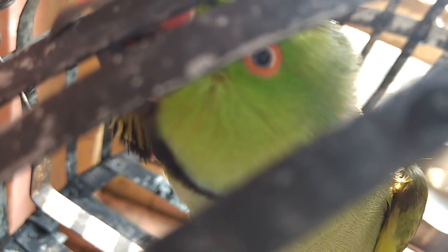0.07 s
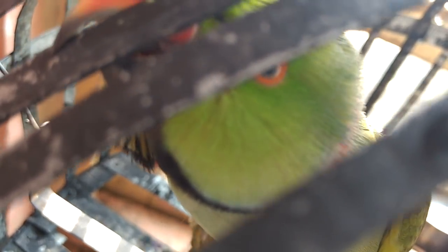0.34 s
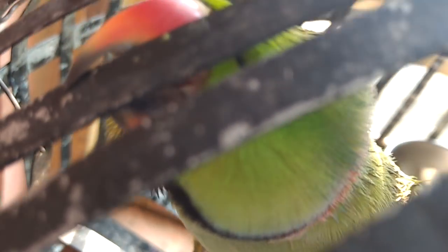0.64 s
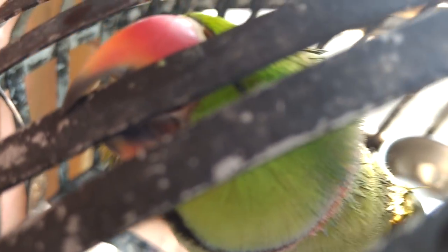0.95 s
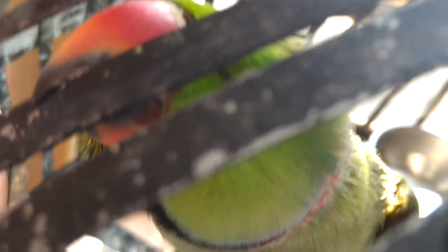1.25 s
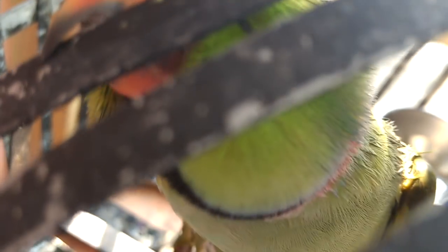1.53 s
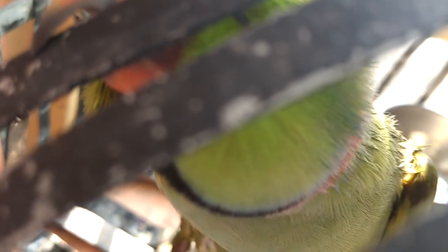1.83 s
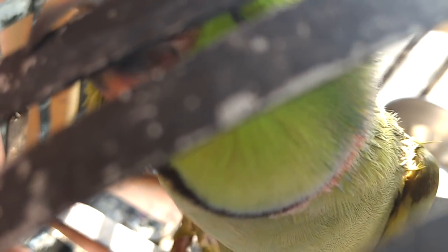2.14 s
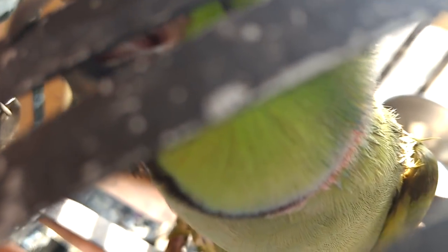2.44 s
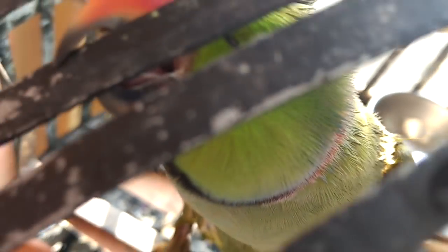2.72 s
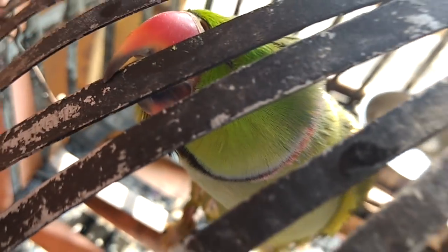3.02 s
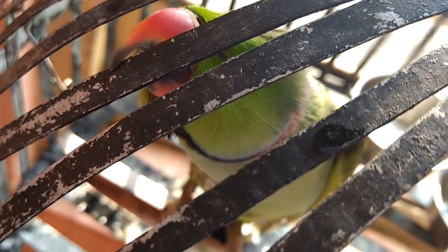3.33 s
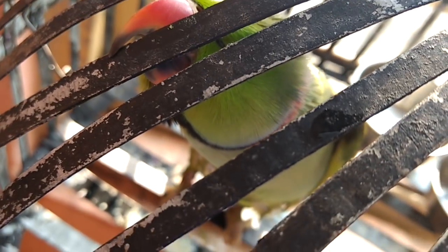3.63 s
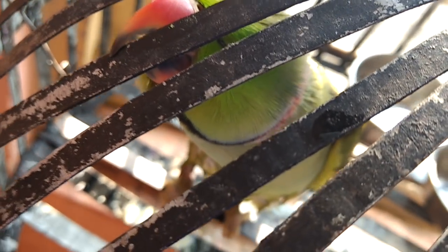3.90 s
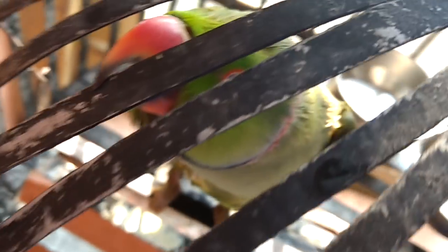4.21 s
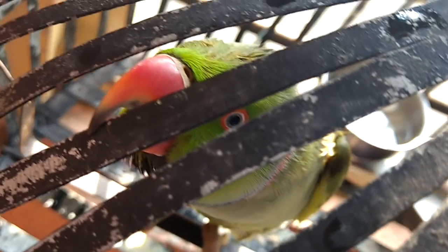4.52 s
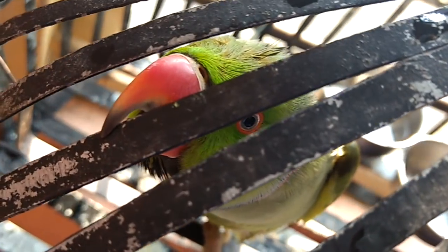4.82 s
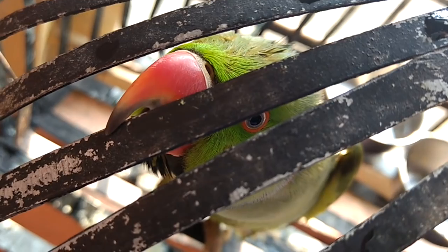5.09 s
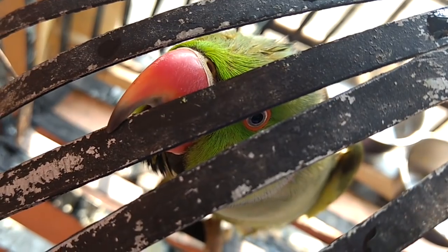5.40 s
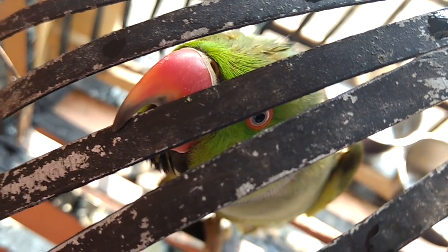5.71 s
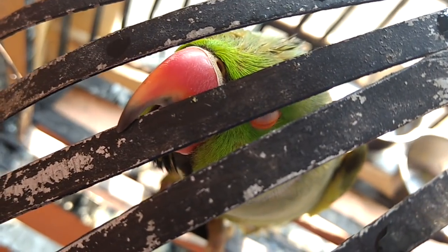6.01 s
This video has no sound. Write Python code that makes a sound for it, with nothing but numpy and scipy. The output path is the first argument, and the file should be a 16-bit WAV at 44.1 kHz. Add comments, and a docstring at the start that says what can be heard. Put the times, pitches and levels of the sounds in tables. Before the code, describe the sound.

Close, hoarse parrot rasping with soft feather rustles, a short pause, then more rasps and two squawks in a quiet room.

```python
"""A caged parrot rasps close by, about three strokes a second, pauses, and rasps on into squawks.
Air flutters through its throat and rings throat and beak resonances over a hollow low ring; each
stroke snaps or eases in, swells and dies away, with soft mutters between. The squawks are pulses
shaped by the throat. Feathers rustle, the beak ticks twice in the pause, and faint chirps are heard.
A small, hushed room answers."""
import sys
import numpy as np
from scipy import signal
from scipy.fft import rfft, irfft, next_fast_len
from scipy.io import wavfile
from scipy.ndimage import uniform_filter1d, map_coordinates

SR = 44100
rng = np.random.default_rng(int(sys.argv[2]) if len(sys.argv) > 2 else 0)


def store_pcm(level_fs):
    """Save levels as 16-bit WAV."""
    pcm = np.round(np.clip(level_fs, -1, 1) * 32767).astype(np.int16)
    wavfile.write(sys.argv[1], SR, np.atleast_2d(pcm).T)


N = 266849


def amp(db):
    """Decibels to gain."""
    return 10 ** (np.asarray(db) / 20)


def unit(x):
    """x at rms 1."""
    return x / np.sqrt(np.mean(x ** 2) + 1e-20)


def along(points, hz):
    """Interpolate (frequency [Hz], value) points on a log axis."""
    f, v = np.transpose(points)
    return np.interp(np.log(hz + 1), np.log(f + 1), v)


def curves(rows):
    """A gate open while the timed rows last, then each column per sample."""
    s, *cols = np.transpose(rows)
    t = np.arange(N) / SR
    gate = uniform_filter1d(1.0 * ((t >= s[0]) & (t <= s[-1])), size=256)
    return [gate] + [np.interp(t, s, c) for c in cols]


def wobble(rate_hz):
    """Smooth random curve with knots at rate_hz."""
    knots = rng.standard_normal(int(N * rate_hz / SR) + 4)
    return map_coordinates(knots, [np.arange(N) * rate_hz / SR])


def filtered(x, response):
    """x through a complex frequency response."""
    m = next_fast_len(N + SR // 2)
    return irfft(rfft(x, m) * response(np.fft.rfftfreq(m, 1 / SR)), m)[..., :N]


def coloured(x, spectrum):
    """x through a (frequency [Hz], gain [dB]) spectrum, at rms 1."""
    return unit(filtered(x, lambda hz: amp(along(spectrum, hz))))


def resonance(hz, centre_hz, width_hz):
    """Causal response of one resonance."""
    return 1j * hz * width_hz / (centre_hz ** 2 - hz ** 2 + 1j * hz * width_hz)


def ring(x, centre_hz, width_hz, skirt=9):
    """x through a resonance whose skirts a wider one steepens, at rms 1."""
    response = lambda hz: resonance(hz, centre_hz, width_hz) * resonance(hz, centre_hz, skirt * width_hz)
    return unit(filtered(x, response))


def steadied(x, share, window_s=0.035):
    """A flow-driven vibration limits itself: chance swells are partly evened out."""
    power = np.abs(uniform_filter1d(x ** 2, size=int(window_s * SR))) + 1e-6
    return unit(x / power ** (share / 2))


def push(t, rise_s, attack_s, fall_db_per_s, swell_db_per_s=0, hold_s=0):
    """One push of air: a gate that snaps open and an effort that swells, holds and dies."""
    swell_db = -swell_db_per_s * np.maximum(rise_s - t, 0)
    effort_db = swell_db - fall_db_per_s * np.maximum(t - rise_s - hold_s, 0)
    return np.clip(t / attack_s, 0, 1), effort_db


def rasp_levels(mutter_scratch_db=-10, mutter_hiss_db=-15):
    """Strokes, mutters and flares drive five bands [dB]: throat, half-closed, open beak, scratch, hiss."""
    # (start [s], rise [s], effort fall [dB/s], peak drive [dB],
    #  then re peak: throat [dB], half-closed beak [dB], open beak [dB], hiss [dB])
    strokes = [(-0.011, 0.06, 105, -27.5, 3, -4, -0.5, -2), (0.204, 0.045, 90, -26.3, 3, -1.5, -4, 1),
               (0.543, 0.012, 120, -33, 1, -4, -7, 6), (0.6, 0.045, 70, -29, 3, -7, -5, -5),
               (0.768, 0.012, 60, -35, 0, -3, 4, 2), (0.805, 0.05, 95, -31, 7, -1.5, 3.5, 1),
               (1.186, 0.05, 150, -28.5, 6.5, -2, 4, -2), (1.413, 0.033, 105, -28.5, 5.5, 0.5, 3, 1),
               (1.795, 0.02, 92, -30, 7, 0.5, 2, 0), (2.007, 0.08, 140, -28.5, 5.5, 3, -1, 4),
               (2.598, 0.035, 100, -33.5, 1, -2, 6, 2), (2.659, 0.036, 175, -25.3, 2.5, 3, -3, 3.5),
               (2.954, 0.006, 170, -31.5, 5, -1, -8, 3), (2.995, 0.03, 115, -28.5, 7, 1, -8, 5),
               (3.184, 0.02, 130, -30.5, 7.5, 1, 8, -1), (3.235, 0.055, 171, -27, 3.5, 2.5, -14, 0),
               (4.55, 0.17, 63, -40, 7, -4.5, -5, 1), (4.749, 0.017, 202, -34, 7, -2, 4, 0),
               (4.905, 0.035, 85, -28.5, 5, 1.5, 0, 3), (5.245, 0.06, 75, -29.5, 4, 2.5, 4, 0),
               (5.47, 0.095, 120, -28.5, 7.5, -1, 4, 3), (5.85, 0.013, 60, -37, 8.5, 1, -3, 0),
               (5.925, 0.0083, 97, -31, 8, 2, 5, 0)]
    # per band: (growth with effort [dB/dB])
    growth = [1.117, 0.86, 1.95, 1.15, 1.15]
    # per band: (stroke attack [s])
    attacks_s = [0.008, 0.013, 0.008, 0.008, 0.008]
    # (start [s], length [s], throat drive [dB], then re throat: half-closed beak [dB], open beak [dB])
    mutters = [(0.43, 0.13, -39, 1, -6), (0.908, 0.05, -31.5, 2, -14), (1.08, 0.1, -34.5, 3, -3),
               (1.332, 0.11, -32.5, -6, 2), (1.678, 0.11, -34.5, 6, -4), (2.32, 0.092, -34.5, 0.5, -15),
               (2.418, 0.11, -32, -6, -5), (2.895, 0.05, -43, 4, -8), (4.832, 0.089, -42, -8, 1),
               (5.184, 0.055, -32.5, 7.5, -5), (5.433, 0.12, -36, 2, 0), (5.757, 0.047, -42, 3, -10)]
    # one resonance flares: (time [s], half width [s], drive [dB], band)
    flares = [(0.084, 0.017, -16, "open"), (0.249, 0.009, -13.5, "open"), (0.66, 0.0095, -14, "open"),
              (1.78, 0.012, -25, "throat"), (2.069, 0.012, -21, "open"), (2.11, 0.02, -19, "half"),
              (5.164, 0.0035, -22.5, "half"), (5.191, .004, -22, "half"), (5.251, 0.011, -17.5, "half"),
              (5.225, 0.006, -22, "half")]
    t = np.arange(N) / SR
    power = np.full((len(growth), N), 1e-12)
    after = lambda s: slice(*np.searchsorted(t, [s, s + .5]))
    for s, rise_s, fall, db, throat_db, half_db, open_db, hiss_db in strokes:
        on = after(s)
        gate, effort_db = push(t[on] - s, rise_s, np.c_[attacks_s], fall, swell_db_per_s=95, hold_s=0.011)
        peaks_db = db + np.c_[[throat_db, half_db, open_db, 0, hiss_db]]
        power[:, on] += (gate * amp(peaks_db + np.outer(growth, effort_db))) ** 2
    for s, length_s, db, half_db, open_db in mutters:
        on = after(s)
        gate, effort_db = push(t[on] - s, length_s, attack_s=0.0062, fall_db_per_s=220)
        gains = amp([0, half_db, open_db, mutter_scratch_db, mutter_hiss_db])
        power[:, on] += np.outer(gains, gate * amp(db + effort_db)) ** 2
    for s, width_s, db, band in flares:
        on = np.abs(t - s) < 10 * width_s
        row = ["throat", "half", "open"].index(band)
        power[row, on] += amp(db) ** 2 * np.exp(-((t[on] - s) / width_s) ** 2)
    return 10 * np.log10(power)


def flutter(rate_hz=165, scatter=0.4, spread_db=4, slap_gain=0.46, depth_db=0.5):
    """Loosely flapping membranes chop the air: uneven slaps, each with a puff of turbulence."""
    cycles = np.cumsum(rate_hz * np.exp(scatter * wobble(rate_hz))) / SR
    slaps = np.diff(np.floor(cycles), prepend=0) * amp(-spread_db * rng.random(N))
    puffs = rng.standard_normal(N) * amp(depth_db * np.cos(2 * np.pi * cycles))
    return unit(slap_gain * unit(slaps) + unit(puffs))


def throat_ring(air, sway_db=2.5):
    """The throat sways between two close resonances: as one grows, the other fades."""
    sway = amp(sway_db * wobble(20))
    lower = ring(air, centre_hz=655, width_hz=65)
    upper = ring(air, centre_hz=750, width_hz=70)
    return steadied(unit(lower * sway - upper / sway), share=0.95)


def wander(x, bend, drift=0.006, rate_hz=14):
    """The tongue never holds still: all frequencies bend and drift by a small fraction."""
    lead = np.cumsum(bend + drift * wobble(rate_hz))
    return map_coordinates(x, [np.arange(N) + lead], mode="mirror")


def beak_ring(air, drive_db, centre_hz, width_hz, bend=0, lock_db=-18.5, drift_hz=20):
    """A beak resonance: noisy when blown softly, locking into a near whistle when blown hard."""
    purity = 1 / (1 + np.exp((lock_db - drive_db) / 2))
    hz = centre_hz * (1 + bend) + drift_hz * wobble(90)
    tone = unit(np.sin(2 * np.pi * np.cumsum(hz) / SR))
    noisy = steadied(wander(ring(air, centre_hz, width_hz), bend), share=0.64)
    return amp(drive_db) * (np.sqrt(1 - purity) * noisy + np.sqrt(purity) * tone)


def patchy(x, depth_db=3.5, bins=4, frames=9):
    """Random narrow peaks and dips give the hiss a faintly tonal grain."""
    z = signal.stft(x, nperseg=1024)[2]
    field = uniform_filter1d(rng.standard_normal(z.shape), size=bins, axis=0)
    field = unit(uniform_filter1d(field, size=frames, axis=1))
    return unit(signal.istft(z * amp(depth_db * field), nperseg=1024)[1][:N])


def scratch(air, scratch_db, hiss_db, split_hz=3600):
    """Broadband air noise: scratch below the split, hiss above."""
    # (frequency [Hz], gain [dB])
    spectrum = [(150, -44), (500, 0.5), (1100, 7), (1900, 5.5), (2500, -1), (3350, -7), (3700, -6),
                (4400, -12.5), (6400, -14), (10500, -26.5), (15500, -36)]
    grit = coloured(patchy(air), spectrum)
    hiss = filtered(grit, lambda hz: 1 - 1 / (1 + (hz / split_hz) ** 10))
    return amp(scratch_db) * (grit - hiss) + amp(hiss_db) * hiss


def crackle(rate_hz=900, spread_db=3.5):
    """Tiny sparse pops of uneven size."""
    pops = (rng.random(N) < rate_hz / SR) * rng.choice([-1, 1], N)
    return unit(pops * amp(spread_db * rng.standard_normal(N)))


def catches(choke_s=0.0027, release_s=0.0045, depth_db=5):
    """Flow gain: the air chokes just before each catch and overshoots as it bursts free."""
    # (time [s])
    catch_times = [1.419, 1.68, 2.662, 2.958, 3.185, 4.752, 5.183]
    db = np.zeros(N)
    for s in catch_times:
        t = np.arange(N) / SR - s
        distance = np.abs(t) / np.where(t < 0, choke_s, release_s)
        db += depth_db * np.sign(t) * np.exp(-np.minimum(distance, 20))
    return amp(uniform_filter1d(db, size=64))


def rasp():
    """Fluttering air rings throat and beak, scratches and crackles. Returns sound and throat drive."""
    # the half-closed beak resonance sinks midway: (time [s], frequency shift [fraction])
    beak_bend = [(2.3, 0.027), (2.9, -0.004)]
    throat_db, half_db, open_db, scratch_db, hiss_db = rasp_levels()
    drive = amp(throat_db)
    air = flutter() * amp(0.93 * wobble(55))
    throat = drive * throat_ring(air)
    beak = beak_ring(air, half_db, centre_hz=1208, width_hz=80, bend=curves(beak_bend)[1])
    beak += beak_ring(air, open_db, centre_hz=1532, width_hz=60)
    grit = scratch(air, scratch_db, hiss_db)
    sizzle = amp(hiss_db - 25.5) * ring(crackle(), centre_hz=7700, width_hz=6000)
    edge_db = (scratch_db + open_db) / 2 - 8.5  # upper resonance of the open beak
    edge = amp(edge_db) * ring(rng.standard_normal(N), centre_hz=2480, width_hz=600)
    rattle = amp(0.89 * wobble(45))
    mix = amp(-1) * throat + amp(0.9) * beak + amp(5.4) * grit + sizzle + edge
    return catches() * rattle * mix, drive


def hollow(drive, lag_s=0.021, exponent=0.61, gain_db=-14.5, pan_db=1.4):
    """A low ring that builds and dies more slowly than the stroke, stronger on the right."""
    # (frequency [Hz], width [Hz], relative gain [dB])
    modes = [(127.2, 3.7, 2.5), (161.6, 14.6, 4.5), (212, 27, 8), (297.5, 83, 4.5), (376.6, 5.4, 7)]
    pole = np.exp(-1 / (lag_s * SR))
    swell = np.abs(signal.lfilter([1 - pole], [1, -pole], drive, zi=[drive[0]])[0]) ** exponent
    air = rng.standard_normal(N) + 0.62 * rng.standard_normal((2, N))
    peaks = lambda hz: sum(amp(db) * resonance(hz, centre, width) for centre, width, db in modes)
    hum = unit(filtered(air, lambda hz: peaks(hz) * resonance(hz, centre_hz=302, width_hz=780) ** 2))
    return swell * steadied(hum, share=0.35) * amp(gain_db + np.c_[[-pan_db, pan_db]])


def room(x, decay):
    """Stereo room tail: each frequency dies at its own speed."""
    hz, t, z = signal.stft(rng.standard_normal((2, SR // 2)), SR, nperseg=256)
    tail = signal.istft(z * amp(-60 * t / along(decay, hz)[:, None]), SR, nperseg=256)[1]
    return signal.fftconvolve(x[None], tail / np.linalg.norm(tail[0]), axes=1)[:, :N]


def ambience(level_db=-50, drift_db=1.86):
    """The hush of the home, wavering slightly."""
    # (frequency [Hz], gain [dB])
    spectrum = [(25, -43), (150, -6), (600, -15.5), (1300, -21), (2600, -17.5), (5000, -23), (15000, -40.5)]
    air = rng.standard_normal(N) + 0.087 * rng.standard_normal((2, N))
    return amp(level_db + drift_db * wobble(4.2)) * coloured(air, spectrum)


def feathers(grain_db=2.0, rise_db_per_s=650, hold_s=0.036, fall_db_per_s=182):
    """Feathers slide over each other in a grainy hiss as the bird bobs and shifts."""
    # (time [s], level [dB])
    rustles = [(0.32, -47), (0.92, -52.5), (1.15, -55), (1.95, -45.5), (2.14, -44), (3.335, -45),
               (4.081, -46), (4.21, -51), (4.496, -38.5), (5.025, -45.5), (5.29, -44.5), (5.65, -44)]
    # (frequency [Hz], gain [dB])
    spectrum = [(400, -17.5), (7000, -14), (10500, -18.5), (13000, -14.5), (15500, -20)]
    t = np.arange(N) / SR
    levels_db = [db - rise_db_per_s * np.maximum(s - t, 0) - fall_db_per_s * np.maximum(t - s - hold_s, 0)
                 for s, db in rustles]
    grains = rng.standard_normal(N) * amp(grain_db * wobble(250))
    return amp(np.max(levels_db, axis=0)) * coloured(grains, spectrum)


def chirps(waver=0.045):
    """Faint, hoarse falling glides."""
    # (time [s], length [s], start [Hz], end [Hz], relative level [dB])
    glides = [(1.485, 0.04, 4830, 4240, -42.5), (3.478, 0.035, 4150, 3950, -51.5),
              (3.652, 0.032, 2700, 2300, -40.5), (3.735, 0.05, 4700, 4400, -57)]
    out = np.zeros(N)
    for s, length_s, start_hz, end_hz, db in glides:
        u = np.linspace(0, 1, int(length_s * SR))
        hz = (end_hz + (start_hz - end_hz) * (1 - u) ** 2) * (1 + waver * wobble(700)[:len(u)])
        envelope = 2 * amp(db) * np.sin(np.pi * u)
        out[round(s * SR):][:len(u)] += envelope * np.sin(2 * np.pi * np.cumsum(hz) / SR)
    return out


def ticks(t60_s=0.012):
    """The beak closes with a dry tick."""
    # (time [s], peak [dB])
    closings = [(3.707, -33), (3.831, -24)]
    # (frequency [Hz], gain [dB])
    spectrum = [(300, -7), (700, 5), (15000, -22)]
    out, t = np.zeros(N), np.arange(SR // 10) / SR
    for s, db in closings:
        burst = coloured(rng.standard_normal(N), spectrum)[:len(t)] * amp(-60 * t / t60_s)
        out[round(s * SR):][:len(t)] += amp(db) * burst / np.abs(burst).max()
    return out


def whistle():
    """One thin, very high tone that rises and falls."""
    # (time [s], pitch [Hz], level [dB])
    contour = [(3.79, 11450, -66), (3.885, 12150, -58), (3.985, 10900, -70)]
    gate, hz, db = curves(contour)
    return gate * amp(db) * np.sin(2 * np.pi * np.cumsum(hz) / SR)


def voice(calls, throat, jitter, rough_db, hoarse_db, harmonics=35):
    """Slightly uneven pulses through the throat, each with a puff of hoarse air."""
    out = np.zeros(N)
    air = coloured(rng.standard_normal(N), [(250, -40), *throat, (16000, -60)])
    for rows in calls:
        gate, pitch_hz, db = curves(rows)
        on = gate > 1e-6
        hz = (pitch_hz * (1 + jitter * wobble(260)))[on]
        phase = 2 * np.pi * np.cumsum(hz) / SR
        tone = sum(amp(along(throat, k * hz)) * np.cos(k * phase) for k in range(1, harmonics + 1))
        puffs = amp(hoarse_db) * air[on] * (1 + np.cos(phase))
        envelope = gate * amp(db + rough_db * wobble(130))
        out[on] += unit(unit(tone) + puffs) * envelope[on]
    return out


def squawks():
    """Twice, a harsh buzz of sharp pulses breaks into a clear nasal call."""
    # per call: (time [s], pulse rate [Hz], level [dB])
    harsh_calls = [
        [(4.765, 227.8, -38), (4.795, 212.3, -21), (4.82, 200, -43)],
        [(5.615, 210, -30), (5.638, 205, -22.5), (5.708, 220, -20), (5.734, 214, -18.3), (5.752, 212, -36),
         (5.8, 212, -48)],
    ]
    clear_calls = [
        [(4.91, 575, -28), (4.96, 579, -23.5), (5.02, 520, -31)],
        [(5.82, 538, -40), (5.836, 553, -25.5), (5.882, 581, -22), (5.935, 557, -23), (5.995, 558, -22.5),
         (6.05, 499, -30.5)],
    ]
    # throat colour: (frequency [Hz], gain [dB])
    harsh_throat = [(440, -16.5), (660, -0.5), (1030, -21), (1300, -3.5), (1550, -18), (1920, 4),
                    (2420, -19), (2800, -9), (3650, -23), (4350, -16.5), (5200, -26), (8000, -28.5)]
    clear_throat = [(560, 8), (1130, 11.5), (1720, 10), (2300, -7), (2880, -3), (3600, -20), (9000, -50)]
    harsh = voice(harsh_calls, harsh_throat, jitter=0.014, rough_db=1.8, hoarse_db=-14)
    clear = voice(clear_calls, clear_throat, jitter=0.008, rough_db=1.6, hoarse_db=-15)
    return harsh + clear


def scene():
    """The near bird in a small room; the chirps echo longer."""
    # decay: (frequency [Hz], t60 [s])
    room_decay = [(150, 0.21), (1000, 0.12), (12000, 0.014)]
    chirp_decay = [(2000, 1), (7000, 0.15)]
    calls = squawks()
    rasping, drive = rasp()
    glides = chirps()
    bird = rasping + calls + ticks() + feathers() + whistle()
    echoes = amp(-14.5) * room(bird, room_decay) + amp(-5.5) * room(glides, chirp_decay)
    return bird + glides + echoes + hollow(drive) + ambience()


def record(dry, top_hz=15550, lag_s=1 / 1790):
    """Band limit; above about 1 kHz the left channel is inverted and lags the right."""
    def response(hz):
        bass_rad = np.interp(hz, [0, 300, 550], [0, 1.2, .25])
        turn_rad = np.maximum(2 * np.pi * hz * lag_s - np.pi, bass_rad)
        return np.exp(.5j * np.array([-turn_rad, turn_rad])) * (hz < top_hz)
    return filtered(dry, response)


dry = scene()
out = record(dry)
store_pcm(out)
```